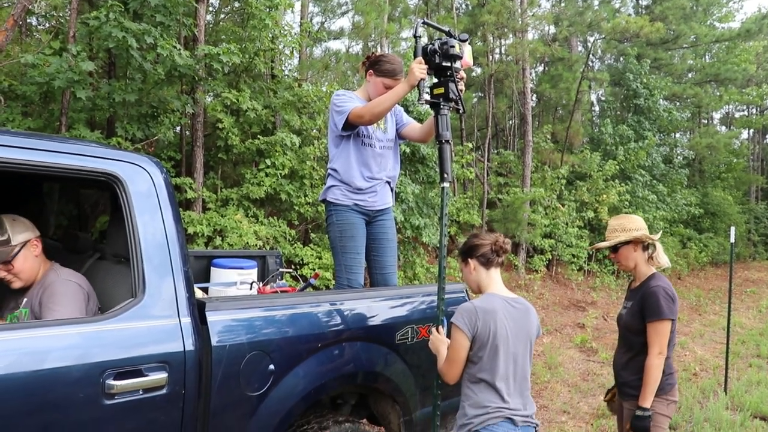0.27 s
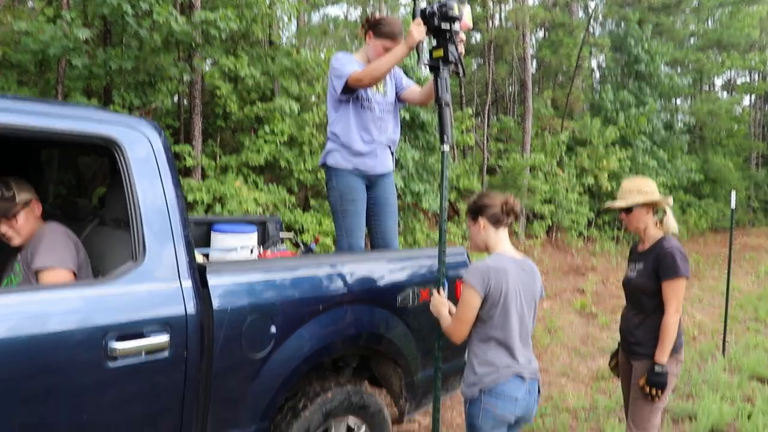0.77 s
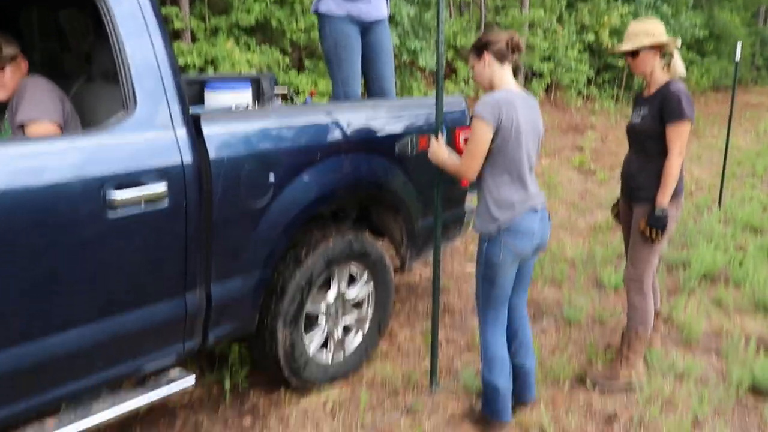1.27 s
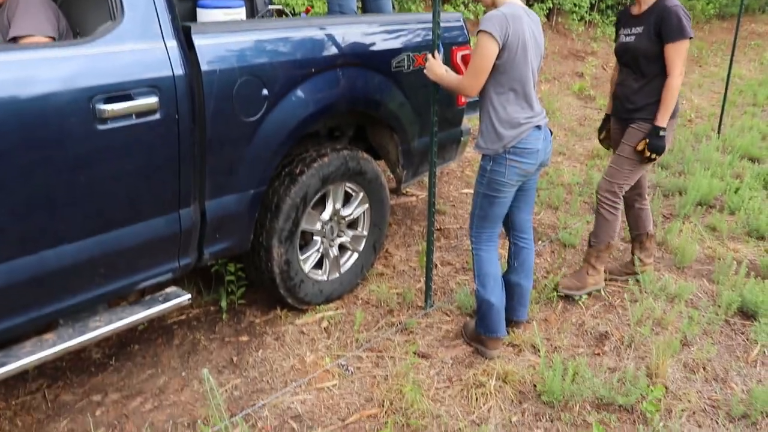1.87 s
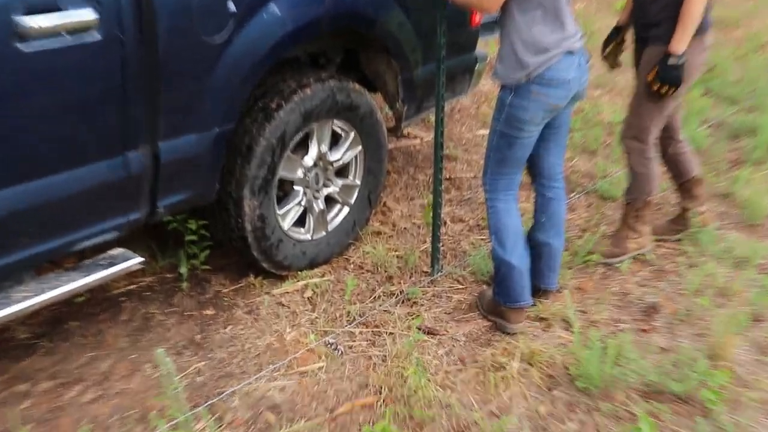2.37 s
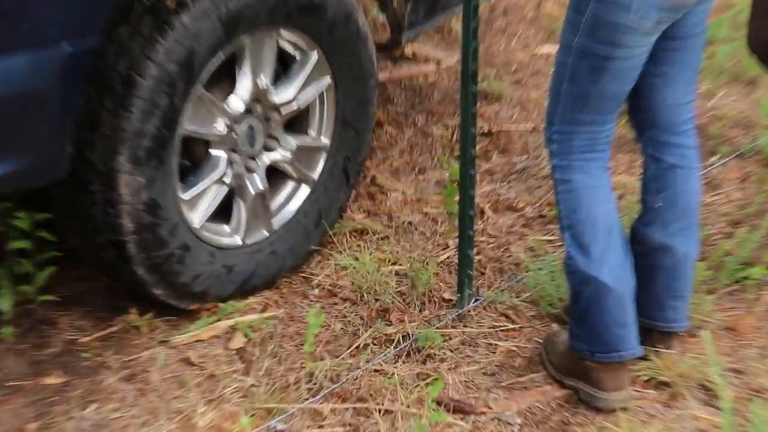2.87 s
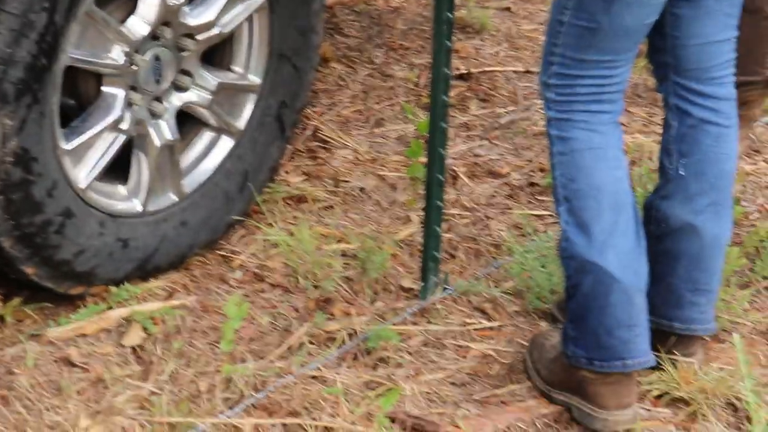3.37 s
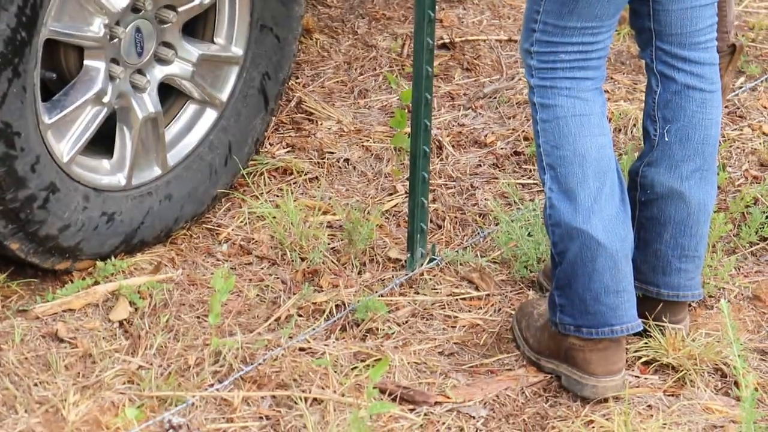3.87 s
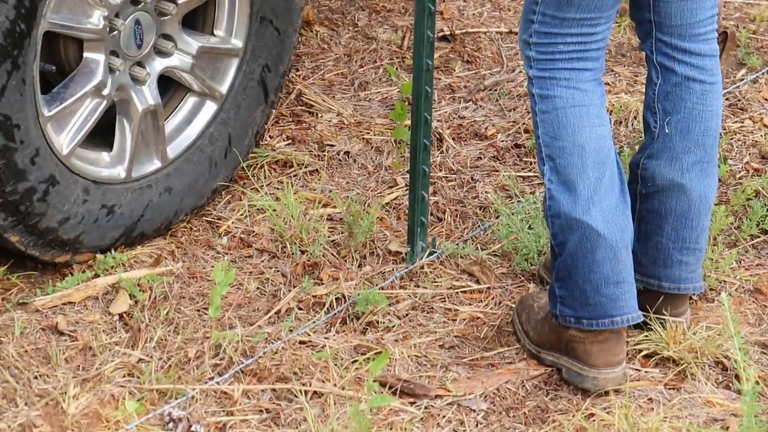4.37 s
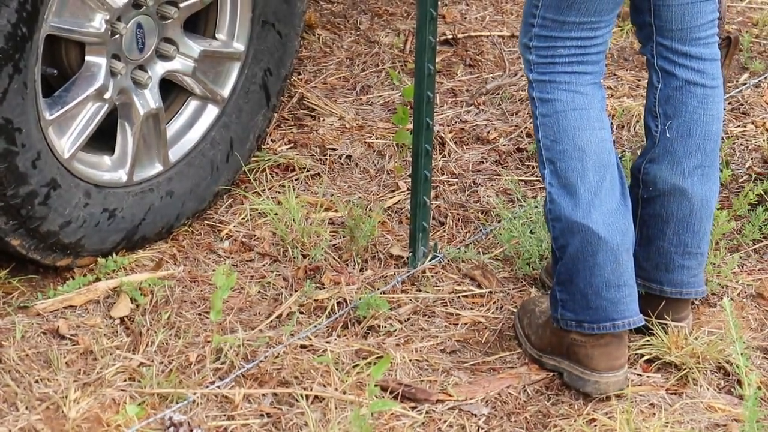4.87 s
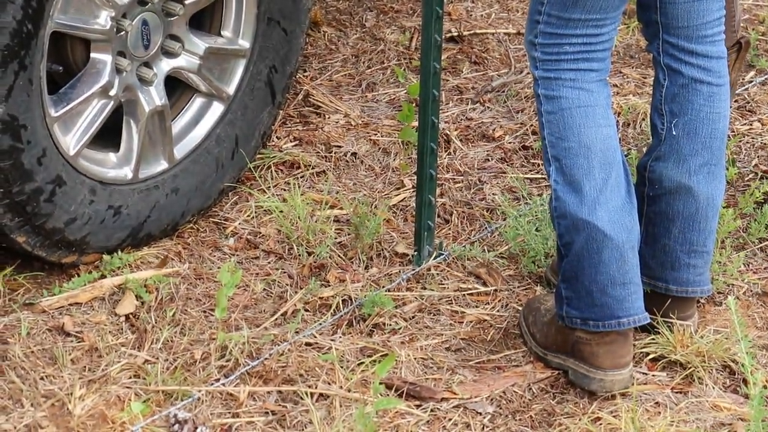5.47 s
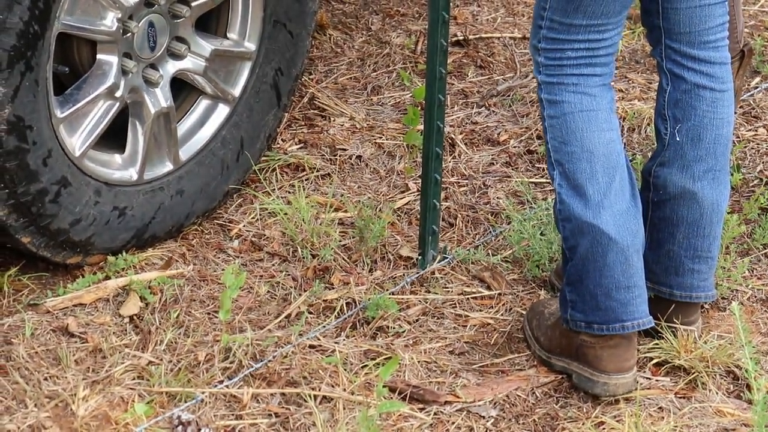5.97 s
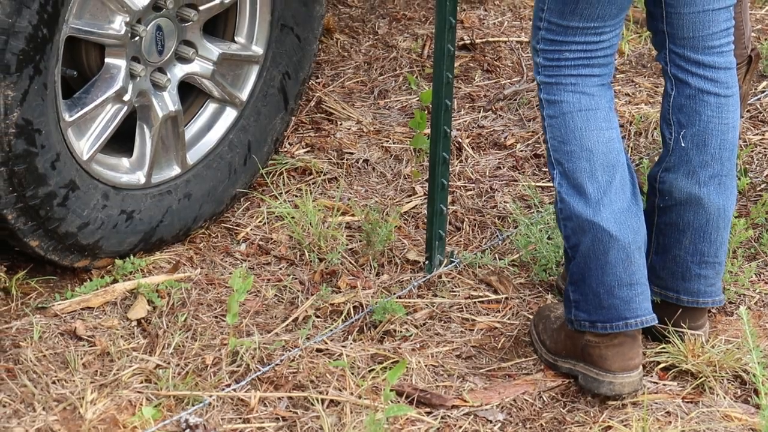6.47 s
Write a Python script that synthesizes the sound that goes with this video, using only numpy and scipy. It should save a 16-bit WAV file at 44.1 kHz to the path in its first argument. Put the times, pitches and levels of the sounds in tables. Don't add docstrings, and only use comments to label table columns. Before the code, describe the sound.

A small four-stroke engine drones and hisses while its post driver pounds a steel post without pause, around twenty-nine blows a second, fusing into a harsh metallic buzz. The post rings and the soil thumps. Outdoors beside a truck, short scattered echoes return. The close microphone turns from driver to ground in the first two seconds, shifting the clatter's colour.

```python
import sys
import numpy as np
from scipy import signal
from scipy.fft import rfft, irfft
from scipy.io import wavfile

SR = 44100
rng = np.random.default_rng(int(sys.argv[2]) if len(sys.argv) > 2 else 0)


def persist_wave(psi):
    counts = np.round(np.clip(psi, -1, 1) * 32767).astype(np.int16)
    wavfile.write(sys.argv[1], SR, np.atleast_2d(counts).T)


def linear_from_db(decibels):
    return 10 ** (np.asarray(decibels, float) / 20)


N = 295911
LENGTH = 4096


def evened(x):
    return x / np.sqrt(np.mean(x ** 2) + 1e-20)


def along(curve, s):
    return np.interp(s, *np.transpose(curve))


def read(points, hz):
    f, value = np.transpose(points)
    return np.interp(np.log(hz + 1), np.log(f + 1), value)


def bump(hz, lo_hz, hi_hz):
    centre_hz = np.sqrt(lo_hz * hi_hz)
    return np.exp(-(np.log((hz + 1) / centre_hz) / np.log(hi_hz / lo_hz) * 2) ** 4)


def slow(rate_hz, count):
    size = N // 64 + 2
    z = rfft(rng.standard_normal((count, size)))
    z[:, np.fft.rfftfreq(size, 64 / SR) > rate_hz] = 0
    return np.array([np.interp(np.arange(N) / 64, np.arange(len(c)), evened(c)) for c in irfft(z)])


def drifting(count, size, keep):
    fresh = rng.standard_normal((count + 30, size))
    return signal.lfilter([np.sqrt(1 - keep ** 2)], [1, -keep], fresh, axis=0)[-count:]


def placed(blows, sounds):
    out = np.zeros(N + 2 * LENGTH)
    for row, sound in zip(blows, sounds):
        out[LENGTH + round(row[0] * SR):][:LENGTH] += sound
    out[LENGTH - 460:][:LENGTH] += sounds[3]
    return out[LENGTH:][:N]


# (time [s], aim [0-1])
MIC_AIM = [
    (0, 0.13),
    (1.0, 0.34),
    (1.7, 0.52),
    (2.1, 0.96),
    (3.0, 0.8),
    (4.5, 1),
    (6.71, 0.99),
]


def aim_at(s):
    return np.clip(along(MIC_AIM, s), 0, 1)


# (time [s], slack [about -1 to 1])
GRIP_SLACK = [(0, -0.15), (.3, 0.71), (.7, 0.32), (1.5, 0.87), (1.85, -0.17), (2.2, 0.25), (2.8, 0.62),
              (3.4, 0.34), (3.95, -.5), (4.2, 0.14), (4.6, -1.1), (4.8, 0.0031), (4.95, 0.14), (5.4, 0.76),
              (5.8, -0.25), (6.1, 0.35), (6.71, 0.4)]


def slack_at(s):
    return along(GRIP_SLACK, s)


# (time [s], rate [blows/s])
BLOW_RATE = [(0.0, 29.08), (0.37, 29.024), (0.61, 29.339), (1.28, 28.765), (1.49, 29.114), (1.75, 28.347),
             (2.27, 28.991), (2.89, 28.138), (3.09, 28.81), (3.85, 28.808), (4.08, 28.608), (4.37, 28.8),
             (4.58, 29.154), (5.36, 28.933), (5.57, 28.542), (6.05, 29.088), (6.25, 28.495), (6.71, 28.897)]


def blow_rate_at(s):
    return along(BLOW_RATE, s)


# (frequency [Hz], t60 [s])
YARD_DECAY = [(500, 0.65), (2000, 0.1), (8000, 0.18), (12000, 0.23)]


def yard(x):
    size = SR // 2
    taps = rng.choice([-1., 1.], size) * (rng.random(size) < .3)
    taps *= np.arange(size) > 200
    hz, t, z = signal.stft(taps, SR, nperseg=256)
    decay = linear_from_db(-60 * t / read(YARD_DECAY, hz)[:, None])
    tail = signal.istft(z * decay, SR, nperseg=256)[1]
    return signal.fftconvolve(x, tail / np.linalg.norm(tail))[:N]


# (frequency [Hz], level [dB per Hz])
ENGINE_HISS = [(60, -18), (200, -9.5), (700, 1.5), (1500, 2), (3000, 0.5), (4000, -5.5), (9000, -8),
               (12000, -11), (15600, -25), (16100, -60)]
# (multiple of the firing rate [1], level [dB])
EXHAUST_UP = [(1, 4), (2, -39), (3, 13), (4, -10.5), (5, -34), (6, -8), (7, -9.5), (8, -18), (9, -30),
              (10, -16), (11, -19), (12, 0), (13, 6.5), (14, -2), (15, -21), (16, 1), (17, -0.5), (18, -15),
              (19, -27.5), (20, -42), (21, -69), (22, -26), (23, -8.5), (24, -5.5), (25, -8), (26, -18)]
EXHAUST_DOWN = [(1, 15), (2, -10), (3, -12), (4, -6), (5, -14), (6, -10), (7, -10), (8, -10.5), (9, -26),
                (10, -14), (11, -12.5), (12, 0), (13, -6), (14, -5), (15, -6.5), (16, -10.5), (17, -4.5),
                (18, -3.5), (19, -16), (20, -31), (21, -26), (22, -25), (23, -5.5), (24, -11.5), (25, -45),
                (26, -6.5)]
FIRINGS_PER_S, USUAL_BLOWS_PER_S = 45.45, 28.8
CLUTCH = .9


def engine():
    t = np.arange(N) / SR
    aim = aim_at(t)
    turns = np.cumsum(FIRINGS_PER_S + CLUTCH * (blow_rate_at(t) - USUAL_BLOWS_PER_S)) / SR
    wobble = slow(rate_hz=9., count=8)
    drone = np.zeros(N)
    for k, ((order, up_db), (_, down_db)) in enumerate(zip(EXHAUST_UP[3:], EXHAUST_DOWN[3:])):
        level_db = (1 - aim) * (up_db - 44.) + aim * (down_db - 48.)
        level_db += 1.2 - 4 * (order in (12, 13)) + .6 * wobble[k % 8]
        drone += linear_from_db(level_db) * np.sqrt(2) * np.cos(2 * np.pi * (order * turns + rng.random()))
    puffs = 1 + .8 * np.exp(-(2 * turns % 1) / .3) + .3 * np.exp(-(turns % 1) / .15)
    colour = linear_from_db(read(ENGINE_HISS, np.fft.rfftfreq(N, 1 / SR)))
    hiss = irfft(rfft(puffs * rng.standard_normal(N)) * colour, N)
    return drone + linear_from_db(-36.5 - 2.9 * aim) * evened(hiss)


# (frequency [Hz], level [dB], t60 [s], delay [s])
SOIL_MODES = [
    (57.6, -38.5, 0.035, 0.0008),
    (100, -59, 0.011, 0.0137),
    (212, -29, 0.016, 0.00353),
    (756, -26, 0.0024, 0.0031),
]


def thump(blows):
    scatter_db = 2. * rng.standard_normal((len(blows), len(SOIL_MODES)))
    strength = linear_from_db(0.69 * blows[:, [1]] + scatter_db)
    modes = []
    for hz, db, t60, delay in SOIL_MODES:
        t = np.arange(LENGTH) / SR - delay
        swell = np.where(t < 0, np.exp(-(t / 0.0014) ** 2), linear_from_db(-60 * abs(t) / t60))
        modes.append(linear_from_db(db) * swell * np.sin(2 * np.pi * hz * t))
    return placed(blows, strength @ np.array(modes))


HUM_UP_DB, HUM_DOWN_DB, HUM_PER_SLACK_DB = -41.5, -43.5, 5.5


def post_hum(blows):
    t, s = np.arange(LENGTH) / SR, blows[:, [0]]
    level_luck, pitch_luck, phase_luck = rng.standard_normal((3, len(blows), 1))
    hum_db = HUM_UP_DB + aim_at(s) * (HUM_DOWN_DB - HUM_UP_DB) + HUM_PER_SLACK_DB * slack_at(s)
    kick = linear_from_db(hum_db + 3.5 + 3.8 * level_luck)
    ring = np.sin(2 * np.pi * 577. * (1 + .004 * pitch_luck) * t + .5 * phase_luck)
    envelope = (1 - np.exp(-t / .0015)) * linear_from_db(-60 * t / .24)
    fade = np.clip((LENGTH - np.arange(LENGTH)) / 1000, 0, 1)
    return placed(blows, kick * ring * envelope * fade)


# (time [s], strength [dB], clang, the deeper steel's share of the blow [dB])
SQUARE_BLOWS = [(1.2622, -3.5, -9.5), (1.4011, -5, -13), (1.6431, -3, -3), (1.713, -3.0, -6.5),
                (1.958, -3.5, -11.5), (2.5481, -3.5, -13), (2.689, -1.5, -11), (2.7243, -4, -12.5),
                (2.8663, -4.5, -11.5), (3.4926, -3.5, -6), (3.5284, -4, -9.5), (3.633, -3, -8.5),
                (3.737, -3, -12), (3.8059, -3, -11), (3.8751, -1.5, -9.0), (4.2589, -2.5, -13),
                (4.397, -4, -10), (4.605, -3.5, -10), (4.949, -4.5, -12), (5.4658, -2, -8.5),
                (5.9192, -4.5, -12.5), (6.1253, -3.5, -11)]
GLANCING_BLOWS = [(0.162, -8.0, -7.5), (0.299, -6.5, -4), (0.6762, -8, -9), (1.228, -8.0, -6.5),
                  (1.923, -6, -8), (2.1676, -7.5, -11), (2.4103, -8.0, -10), (2.5153, -8.0, -7.5),
                  (2.5846, -7, -7), (2.759, -6.5, -5.5), (2.9038, -7.5, -5), (3.2161, -6.5, -6.5),
                  (3.5638, -10.5, -6), (3.91, -9, -11), (3.945, -7.5, -10.5), (4.015, -8, -7),
                  (4.2942, -7.5, -11.5), (4.4675, -7.0, -8), (4.9821, -6.5, -4), (5.0525, -8, -7),
                  (5.4314, -6, -6.5), (5.5363, -7.5, -9.5), (5.6063, -7.0, -6.0), (5.8502, -9, -8),
                  (6.0227, -9.5, -8), (6.0916, -6.0, -2.5), (6.1605, -6.5, -10), (6.3362, -6.5, -6.0),
                  (6.545, -7, -6.5), (6.6502, -5.5, -5)]
STROKE_LEFT, JITTER_S = .706, .0003
USUAL_DB, SPREAD_DB = -5.5, .8
USUAL_CLANG_DB, CLANG_SPREAD_DB = -9, 1.7


def strokes():
    t = np.arange(N) / SR
    turns = np.cumsum(blow_rate_at(t)) / SR - STROKE_LEFT
    s = np.interp(np.arange(int(turns[-1]) + 1), turns, t)
    late, hard, deep = np.clip(rng.standard_normal((len(s), 3)), -2, 2).T
    hard = evened(hard - .3 * np.roll(hard, 1))
    strength_db = USUAL_DB + SPREAD_DB * hard
    clang_db = USUAL_CLANG_DB + CLANG_SPREAD_DB * deep
    rows = np.transpose([s + JITTER_S * late, strength_db, clang_db])
    for row in SQUARE_BLOWS + GLANCING_BLOWS:
        rows[np.argmin(abs(s - row[0]))] = row
    return rows


# (delay [s], level aimed up [dB], level aimed down [dB])
REBOUNDS = [
    (.0003, -2, 1.5),
    (.0021, 1, 2),
    (.0033, -3, 3),
    (.0043, -10, 2),
]


def chatter(aim, t):
    luck = rng.standard_normal((len(aim), 2 * len(REBOUNDS)))
    contact = linear_from_db(-11.5) * np.clip(t / 0.00033, 0, 1) * linear_from_db(-60 * np.maximum(t - .0048, 0) / 0.029)
    for k, (delay, up_db, down_db) in enumerate(REBOUNDS):
        late = t - delay - 0.00029 * (k > 0) * luck[:, [k]]
        rebound_db = up_db + aim * (down_db - up_db) - 5 + 2. * luck[:, [-1 - k]]
        contact = contact + linear_from_db(rebound_db) * (late > 0) * np.exp(-abs(late) / 0.00048)
    return contact


# (frequency [Hz], level aimed up [dB], level aimed down [dB], t60 [s])
STEEL_MODES = [(1634, -2, -7.5, 0.016), (1605, -3, 6, 0.086), (2357, -13, 6.5, 0.0082),
               (3003, -4.5, -2.5, 0.039), (3294, -12, -2, 0.019), (3744, -21, -4.5, .018),
               (4480, -14, -5.5, 0.007), (5250, -6, -10.5, 0.037), (6640, -1, -8.5, 0.06),
               (7350, -20, -2.5, 0.0084), (8130, -15, 0, 0.004), (8680, 0, -9, 0.045),
               (8930, -39, -0.5, 0.0065), (9870, -2, 1.5, 0.015), (11420, -21, -2, 0.005),
               (13000, -7, 6, 0.016), (14070, -2, 8.5, 0.0081)]


def steel_body(aim, hz):
    seat = drifting(count=len(aim), size=2 * len(STEEL_MODES), keep=0.35)
    body = np.ones((len(aim), 1))
    for k, (mode_hz, up_db, down_db, t60) in enumerate(STEEL_MODES):
        centre = mode_hz * (1 + .006 * seat[:, [k]])
        ring_db = up_db + aim * (down_db - up_db) + 2.2 * seat[:, [-1 - k]]
        body = body + linear_from_db(ring_db) / (1 + 1j * (hz - centre) * min(t60, .035) / 1.1)
    return body


# (frequency [Hz], level [dB per Hz])
CRACK_UP = [(300, -23), (1000, 2), (1500, -8), (2800, 0), (4750, -7), (7000, 0), (9800, 0), (11000, -11),
            (12500, -0.5), (14300, -5), (14900, -4), (15600, -15), (16000, -41), (16900, -48)]
CRACK_DOWN = [(300, 25), (1000, -1), (1500, -6.5), (2500, -7.5), (4500, -2.5), (6000, -4.5), (8500, -2),
              (9900, -5), (10700, -5.5), (14300, -8.5), (14900, -8), (15600, -11), (16000, -33),
              (16900, -39)]
DEEP_PER_SLACK_DB = 2.5
SIZZLE_DB, SIZZLE_LOSS_DB_PER_S = 0.7, 0.73


def crack_colour(s, clang_db, aim, hz):
    sizzle_db = SIZZLE_DB - SIZZLE_LOSS_DB_PER_S * s + 0.48 * drifting(count=len(s), size=1, keep=0.34)
    colour_db = (1 - aim) * read(CRACK_UP, hz) + aim * read(CRACK_DOWN, hz)
    colour_db += 1.43 * (clang_db + 9.5) * bump(hz, 730, 6350)
    colour_db += DEEP_PER_SLACK_DB * slack_at(s) * bump(hz, 1480, 1680)
    return colour_db + sizzle_db * bump(hz, 10500, 15500)


def hammer(blows):
    s, strength_db, clang_db = (c[:, None] for c in blows.T)
    t, hz = np.arange(LENGTH) / SR, np.fft.rfftfreq(LENGTH, 1 / SR)
    aim = aim_at(s)
    roughness = .85 * drifting(count=len(s), size=LENGTH, keep=.92)
    roughness += .53 * rng.standard_normal((len(s), LENGTH))
    contact = chatter(aim, t) * roughness
    rattle = linear_from_db(-2.5) * np.clip(t / 0.012, 0, 1) * linear_from_db(-60 * t / 0.04) * roughness[::-1]
    dull = linear_from_db(-2. * hz / 10000) / (1 + (hz / 15800) ** 60)
    force = (rfft(contact) + dull * rfft(rattle)) / (1 + (1338.0 / (hz + 1)) ** 6)
    lag = np.exp(-2j * np.pi * 0.002047 * 1840.0 * np.arctan(hz / 1970.0))
    colour = linear_from_db(crack_colour(s, clang_db, aim, hz))
    sounds = irfft(force * steel_body(aim, hz) * colour * lag)
    sounds *= np.clip((LENGTH - np.arange(LENGTH)) / 600 - 1, 0, 1)
    power = np.mean(sounds[:, :256] ** 2, axis=1, keepdims=True)
    return placed(blows, linear_from_db(strength_db - 8.0) * sounds / np.sqrt(power))


def scene():
    blows = strokes()
    clatter = hammer(blows)
    echo = linear_from_db(-20.5) * yard(clatter)
    return (engine() + echo + thump(blows) + post_hum(blows) + clatter)[None]


def band_limit(x):
    return signal.sosfilt(signal.butter(12, 16970, fs=SR, output="sos"), x)


def record(dry):
    cut = signal.sosfilt(signal.butter(2, 45., "high", fs=SR, output="sos"), dry)
    overloaded = .9 * np.tanh(cut / .87)
    edge = signal.firwin(301, 16850, window=("kaiser", 9), fs=SR)
    limited = signal.oaconvolve(overloaded, edge[None], "same")
    return band_limit(limited)


dry = scene()
out = record(dry)
persist_wave(out)
```